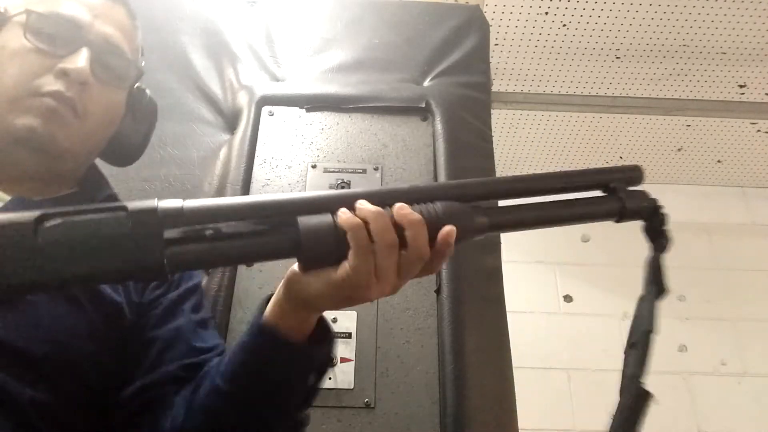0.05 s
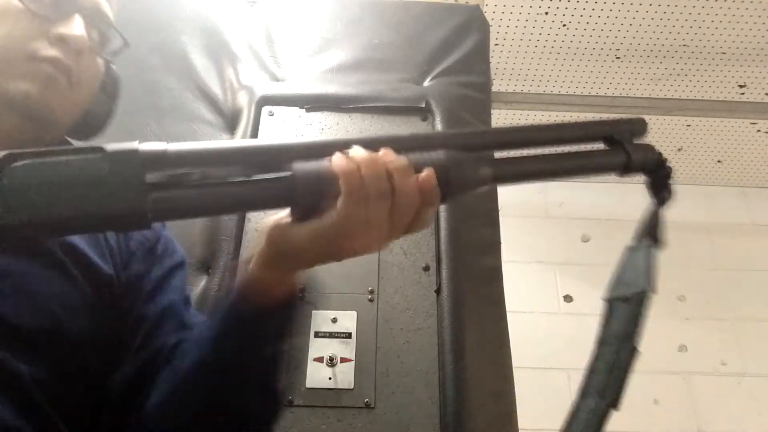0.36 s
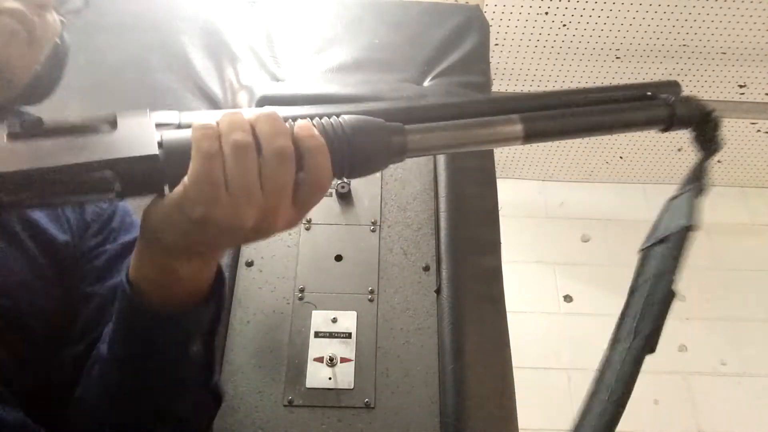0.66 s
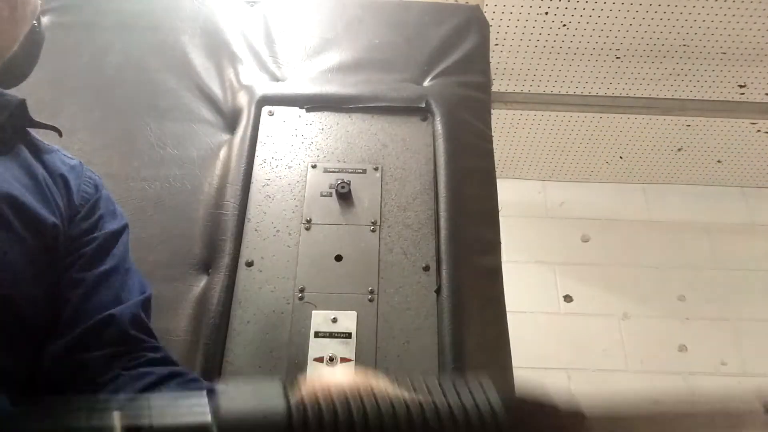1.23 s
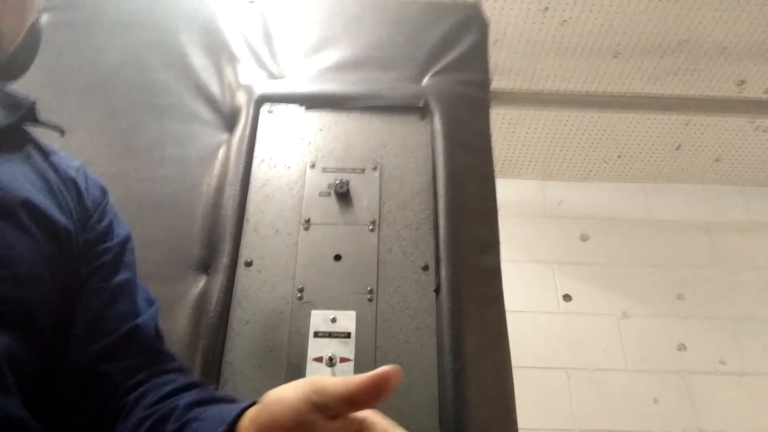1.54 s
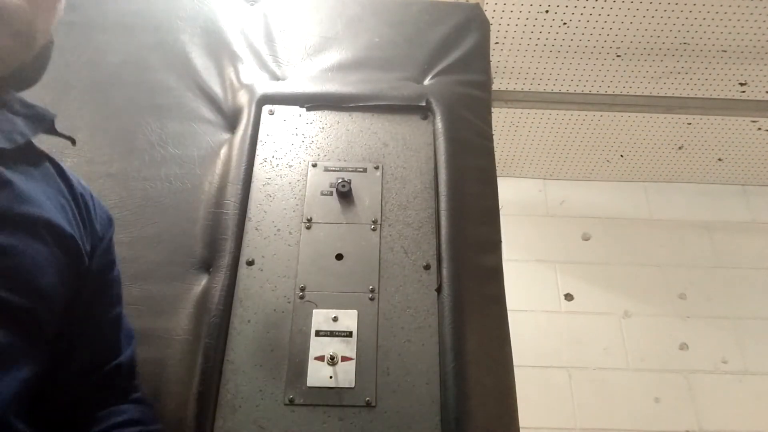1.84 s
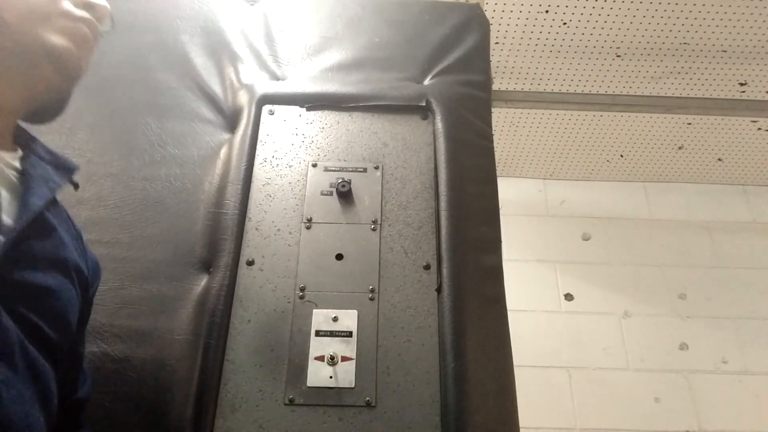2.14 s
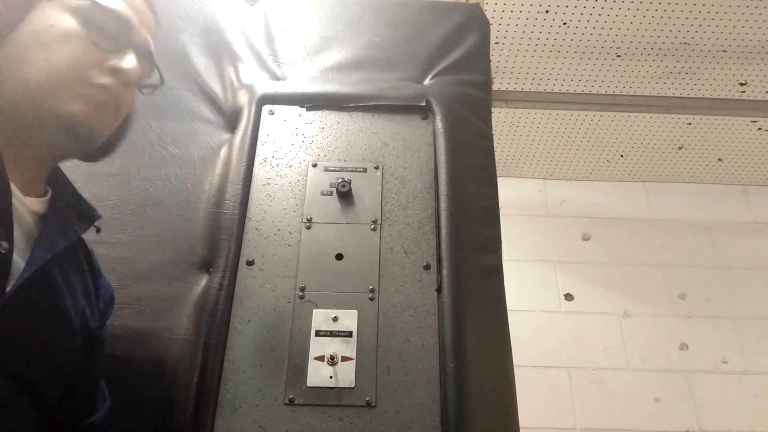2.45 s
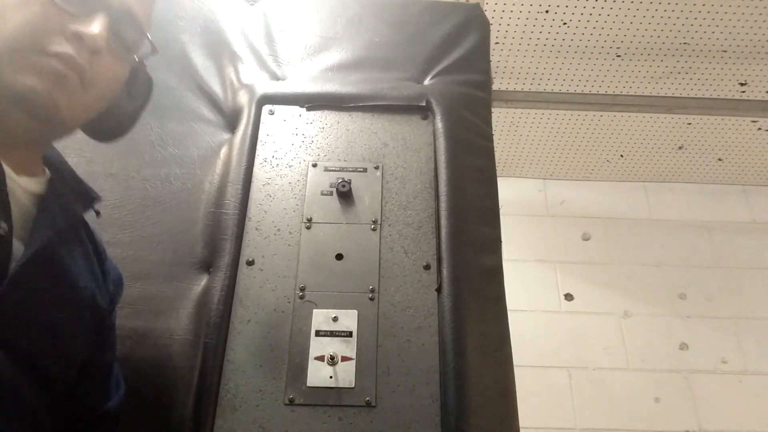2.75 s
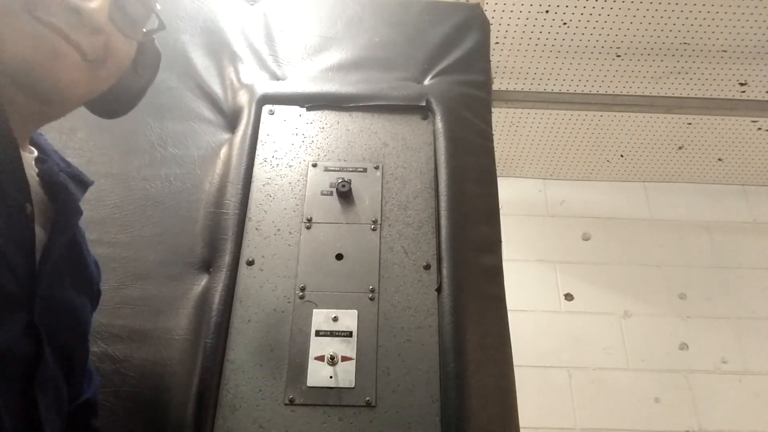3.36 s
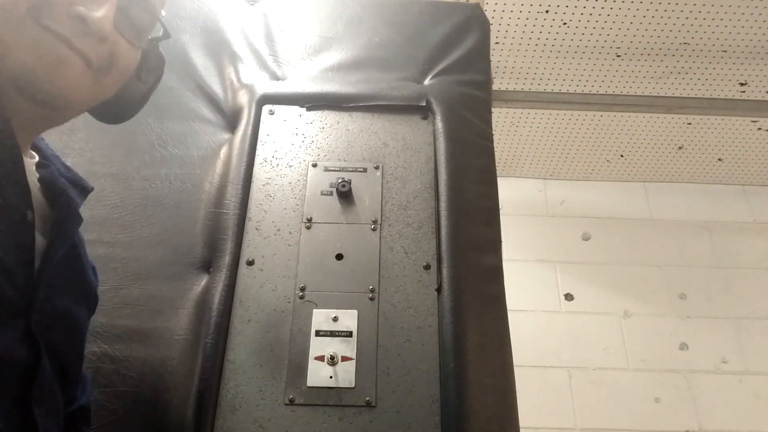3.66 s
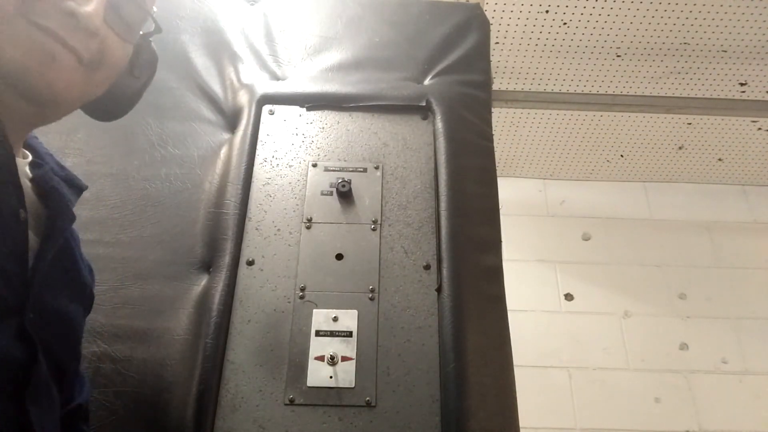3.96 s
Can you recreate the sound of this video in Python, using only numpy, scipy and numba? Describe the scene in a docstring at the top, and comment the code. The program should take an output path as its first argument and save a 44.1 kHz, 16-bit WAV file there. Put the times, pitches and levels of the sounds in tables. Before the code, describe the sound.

Sharp steel clacks of a shotgun being pumped, then soft knocks in a humming indoor range.

```python
"""Ventilation hums in the booth of an indoor range. A pump-action shotgun is racked twice: steel parts
clack in quick clusters, the forend (the sliding grip) scrapes, the bolt thuds and the hall rings on.
Automatic gain control turns the sound down at loud clacks, then lets the room swell back.
A jacket rustles, the gun is set down on the bench with a few knocks and a rattle, and the jacket
brushes softly three more times over the hum."""
import sys
import numpy as np
from scipy import signal
from scipy.fft import rfft, irfft, next_fast_len
from scipy.io import wavfile
from scipy.ndimage import map_coordinates
from numba import njit

SR = 44100
rng = np.random.default_rng(int(sys.argv[2]) if len(sys.argv) > 2 else 0)


def transcribe(signal):
    """Save signal, clipped to [-1, 1], as a 16-bit WAV file at the path in sys.argv[1]."""
    frames = np.atleast_2d(signal).T
    limited = np.clip(frames, -1, 1)
    pcm = np.round(limited * 32767).astype(np.int16)
    wavfile.write(sys.argv[1], SR, pcm)


N = 176400  # 4 seconds

# tone of the rushing air: (frequency [Hz], level [dB])
AIR_TONE = [(20, 6), (40, -9.5), (75, 2), (110, -5), (165, -2), (205, 2.5), (240, -8), (330, -8.5),
            (530, -5), (750, -7.5), (950, -8), (1350, -15), (1900, -21), (2700, -22.5), (3800, -23.5),
            (5500, -28), (10000, -29.5), (15500, -35)]
# the fan's hum: (multiple of its turning rate, level [dB])
FAN_HUM = [(1, -29.5), (3, -26.5), (5, -40), (18, -39)]
# steel hitting steel inside the gun: (time [s], level [dB], treble tilt [dB per octave])
CLACK_HITS = [(0.027, -17, -11.5), (0.0592, -20.5, -4), (0.066, -20.5, 1), (0.0828, -17, 2),
              (0.0903, -11, 4.5), (.1238, -4.5, -1), (.133, -10.5, -4), (0.1418, -3.5, 0.5),
              (0.158, -0.5, 1.5), (0.1664, 1, -2.5), (.176, 12.5, 1), (.261, -1.5, -2.5), (0.2967, -5.5, 2),
              (.309, -6.5, 1), (0.3178, 3, 7), (.3205, 10, -1), (.329, 11, 1), (.4472, -1.5, 11),
              (.4673, -12, 5), (0.4896, 5, 5), (0.4982, 3.5, -1), (.506, 10, 0), (.514, 9.5, 0),
              (.521, 3.5, 4), (.5582, 7, 0), (0.5882, -2, 5), (0.593, -3, -4), (.602, 0, -3),
              (.6122, 12, 0), (0.6143, 12.5, -2), (.621, 11.5, 1.5)]
# tone of a clack: (frequency [Hz], level [dB])
CLACK_TONE = [(100, -7), (300, -8.5), (1000, -6), (1750, -5.5), (2500, -9), (3700, 0), (5800, 1),
              (8000, 1.5), (11000, -0.5), (15500, 1)]
# ringing barrel, receiver (the gun's body) and magazine tube: (frequency [Hz], level [dB], fade time [s])
STEEL_NOTES = [(1104, -10, .12), (1480, -12, .15), (4549, -4, .2), (5003, 2, .17), (5139, 3, .17),
               (5372, 0, .15), (5462, -1, .15), (5860, -1, .15), (6189, 0, .13), (6357, -2, .15),
               (10825, -3, .18), (11430, -3, .12), (12431, -2, .2), (13105, -1, .2)]
# how long the hall rings: (frequency [Hz], fade time [s])
HALL_FADES = [(200, 0.32), (1500, 0.71), (4000, 0.65), (8000, 0.55), (12000, 0.42), (16000, 0.25)]
# the forend sliding on its tube: (start [s], end [s], level [dB])
SLIDE_STROKES = [(0.098, 0.17, -28.5), (0.37, 0.486, -15), (0.582, .62, -8.5)]
# tone of the scraping: (frequency [Hz], level [dB])
SLIDE_TONE = [(200, -26), (700, -5.5), (1700, -6), (2600, -11), (4000, -4), (8000, -2.5), (15500, -6)]
# the bolt slamming into its end stops: (time [s], level [dB])
BOLT_HITS = [(.177, 2), (0.3205, 10.5), (0.5142, 5.5), (0.6138, 8.5)]
# tone of a thud: (frequency [Hz], level [dB])
THUD_TONE = [(60, 12), (350, 0.5), (1000, -3), (2200, -5), (5000, -26)]
# the jacket brushing: (middle time [s], half length [s], level [dB], treble tilt [dB per octave])
CLOTH_SWELLS = [(1.17, 0.069, -44, 5), (2.74, 0.071, -44, 0), (3.36, 0.11, -41.5, 5),
                (3.903, 0.2, -41, -2.5)]
# tone of the cloth: (frequency [Hz], level [dB])
CLOTH_TONE = [(1000, -2), (2400, -10), (3600, 4), (5000, -6), (9000, -11), (12000, -8.5), (15500, -23)]
# the gun meeting the bench: (time [s], knock level [dB], rattle level [dB])
BENCH_HITS = [(1.668, -13.5, -34), (1.6742, -15.5, -40), (1.680, -15, -18), (1.687, -12, -13.5),
              (1.693, -14, -19), (1.697, -16, -32), (1.709, -22, -22), (1.718, -17, -18.5),
              (1.7265, -17.5, -30), (1.802, -22.5, -28), (1.828, -40, -27), (1.853, -47, -26.5),
              (1.879, -49, -31)]
# tone of a knock: (frequency [Hz], level [dB])
KNOCK_TONE = [(60, -5), (230, -2), (500, -1), (1050, 0.5), (1650, -7.5), (2600, -14), (4000, -22),
              (12000, -31)]
# the ringing bench: (frequency [Hz], level [dB], fade time [s])
BENCH_NOTES = [(272, 1, 0.15), (468, 2, 0.11), (902, 2, 0.084), (1120, 2.5, 0.1), (1476, 2.5, 0.12)]
# tone of the loose parts rattling: (frequency [Hz], level [dB])
RATTLE_TONE = [(500, -13), (2000, 2), (6000, -3.5), (10000, -2.5), (15500, -2.5)]

# A fade time, or T60, is the seconds a sound takes to fall by 60 dB.
AIR_DB, TOP_HZ = -27, 15850
DUCT_HZ, DUCT_WIDTH_HZ, DUCT_DB, DUCT_THROB_DB, DUCT_THROB_PER_S = 135.6, 14.6, -25.5, 2, 9
FAN_HZ, FAN_DRIFT_HZ, FAN_WAVER_DB = 19.6, 0.042, 1.1
CLACK_ATTACK_S, CLACK_HOLD_S, CLACK_T60, STEEL_RING_DB = 0.00077, 0.0011, 0.014, -30.5
CHATTER_DB, CHATTER_T60, CHATTER_GROWTH = -9.5, 0.072, 0.43  # growth: extra dB for each dB of the hit
RIPPLE_DB, RIPPLE_STEP_HZ = 2.5, 440
HALL_DB, HALL_BUILD_S = -13, 0.0096
SLIDE_EDGE_S, SLIDE_GRAIN_DB = 0.012, -0.5
THUD_T60, RECEIVER_HZ, RECEIVER_DB, RECEIVER_T60 = 0.0094, [770, 1780, 2134], -19, 0.037
LANDING_S, LANDING_HZ, LANDING_DB, LANDING_T60 = 1.668, 43.8, -10, 0.15
KNOCK_ATTACK_S, KNOCK_T60, BENCH_RING_DB, RATTLE_T60 = 0.00072, 0.062, -15.5, 0.023
CEILING, GAIN_ATTACK_S, GAIN_HOLD_S, GAIN_RELEASE_S = 0.76, 0.00015, 0.034, 0.074
GAIN_WINDOW_DB = 7  # peaks this close under the ceiling keep the volume from coming back
THUMP_PER_DB, THUMP_HZ = 0.04, 5.6


def amp(db):
    """Turn decibels into a number to multiply by."""
    return 10 ** (np.asarray(db) / 20)


def unit(x):
    """Scale a sound to an average power of 1."""
    return x / np.sqrt(np.mean(x ** 2) + 1e-20)


def along(points, hz):
    """Read between the rows of a (frequency, value) table on a log scale."""
    freqs, values = np.transpose(points)
    return np.interp(np.log(hz + 1), np.log(freqs + 1), values)


def filtered(x, response):
    """Multiply each frequency in a sound by response(hz)."""
    size = next_fast_len(len(x) + SR // 4)
    return irfft(rfft(x, size) * response(np.fft.rfftfreq(size, 1 / SR)), size)[:len(x)]


def noise(tone, size, tilt_db=0):
    """Noise with the given tone; a positive tilt makes it brighter."""
    gain = lambda hz: amp(along(tone, hz) + tilt_db * np.log2(1 + hz / 2000)) * (hz < TOP_HZ)
    return unit(filtered(rng.standard_normal(size), gain))


def wobble(rate):
    """A smooth curve through `rate` random values a second."""
    return map_coordinates(rng.standard_normal(int(N * rate / SR) + 4), [np.arange(N) * rate / SR])


def fade(t, t60):
    """Die away by 60 dB every t60 seconds."""
    return np.exp(-np.log(1000) * t / t60)


def ring(notes, t):
    """The fading notes of a struck object, a little different at every hit."""
    return sum(amp(db + 2 * rng.standard_normal()) * fade(t, t60)
               * np.sin(2 * np.pi * (hz * t + rng.random())) for hz, db, t60 in notes)


def add(track, s, sound):
    """Mix a sound in, starting at s seconds."""
    part = track[round(s * SR):][:len(sound)]
    part += sound[:len(part)]


def ventilation():
    """Air rushes, a duct booms around one low note and a slightly unsteady fan hums."""
    duct = unit(filtered(rng.standard_normal(N), lambda hz: 1 / (1 + ((hz - DUCT_HZ) / DUCT_WIDTH_HZ) ** 2)))
    air = amp(AIR_DB) * noise(AIR_TONE, N)
    throb = amp(DUCT_THROB_DB * wobble(DUCT_THROB_PER_S))
    out = air + amp(DUCT_DB) * unit(duct * throb)
    turns = np.cumsum(FAN_HZ + FAN_DRIFT_HZ * wobble(4.58)) / SR
    for multiple, db in FAN_HUM:
        level = np.sqrt(2) * amp(db + FAN_WAVER_DB * wobble(7.6))
        out += level * np.sin(2 * np.pi * (multiple * turns + rng.random()))
    return out


def steel_clacks():
    """Steel cracks and rings faintly at each hit; harder hits set loose parts chattering."""
    direct, all_round, t = np.zeros(N), np.zeros(N), np.arange(SR // 4) / SR
    crack = fade(np.maximum(t - CLACK_HOLD_S, 0), CLACK_T60)
    for s, db, tilt in CLACK_HITS:
        chatter = amp(CHATTER_DB + CHATTER_GROWTH * db) * fade(t, CHATTER_T60)
        shape = np.hypot(crack, chatter) * (1 - np.exp(-t / CLACK_ATTACK_S))
        burst = shape * noise(CLACK_TONE, len(t), tilt)
        clack = amp(db) * (burst + amp(STEEL_RING_DB) * ring(STEEL_NOTES, t))
        add(all_round, s, clack)
        add(direct, s, aimed(clack))
    return direct, all_round


def aimed(sound):
    """Each hit sends its sound toward the microphone differently, giving random peaks and dips in tone."""
    ripple_db = RIPPLE_DB * rng.standard_normal(128)
    return filtered(sound, lambda hz: amp(np.interp(hz / RIPPLE_STEP_HZ, np.arange(128), ripple_db)))


def hall(x):
    """The range's echo builds up quickly, then fades; the middle pitches last longest."""
    hz, t, bands = signal.stft(rng.standard_normal(SR), SR, nperseg=256)
    bands = bands * fade(t, along(HALL_FADES, hz)[:, None]) * (1 - np.exp(-t / HALL_BUILD_S))
    tail = signal.istft(bands, SR, nperseg=256)[1]
    return signal.fftconvolve(x, tail / np.linalg.norm(tail))[:N]


def forend_scrape():
    """The grip makes a grainy scrape while it slides along its tube."""
    t = np.arange(N) / SR
    strokes = sum(amp(db) * np.clip(np.minimum(t - start, end - t) / SLIDE_EDGE_S + .5, 0, 1)
                  for start, end, db in SLIDE_STROKES)
    return strokes * unit(noise(SLIDE_TONE, N) * amp(SLIDE_GRAIN_DB * wobble(400)))


def bolt_thuds():
    """The bolt stops with a dull thud at either end of its travel, and the hollow receiver rings."""
    out, t = np.zeros(N), np.arange(SR // 10) / SR
    for s, db in BOLT_HITS:
        hollow = ring([(hz, RECEIVER_DB, RECEIVER_T60) for hz in RECEIVER_HZ], t)
        thud = fade(t, THUD_T60) * noise(THUD_TONE, len(t))
        add(out, s, amp(db) * (thud + hollow))
    return out


def jacket_rustle():
    """Cloth rubs in soft swells as the shooter moves."""
    t = np.arange(N) / SR
    return sum(amp(db) * np.exp(-.5 * ((t - s) / width) ** 2) * noise(CLOTH_TONE, N, tilt)
               for s, width, db, tilt in CLOTH_SWELLS)


def set_down():
    """The gun's weight rocks the bench; it knocks a few times while its loose parts rattle and settle."""
    out, t = np.zeros(N), np.arange(SR // 3) / SR
    rocking = amp(LANDING_DB) * fade(t, LANDING_T60) * np.sin(2 * np.pi * LANDING_HZ * t)
    add(out, LANDING_S, rocking)
    onset = 1 - np.exp(-t / KNOCK_ATTACK_S)
    for s, knock_db, rattle_db in BENCH_HITS:
        knock = fade(t, KNOCK_T60) * noise(KNOCK_TONE, len(t)) + amp(BENCH_RING_DB) * ring(BENCH_NOTES, t)
        rattle = fade(t, RATTLE_T60) * noise(RATTLE_TONE, len(t))
        add(out, s, (amp(knock_db) * knock + amp(rattle_db) * rattle) * onset)
    return out


def scene():
    """The gun close by, with the hall's echo, over the ventilation."""
    direct, all_round = steel_clacks()
    handling = bolt_thuds() + forend_scrape() + set_down()
    echo = amp(HALL_DB) * hall(all_round + handling)
    return (direct + handling + echo + jacket_rustle() + ventilation())[None]


@njit
def ducking(excess_db, attack, hold, release, window_db):
    """How many dB to turn the sound down: grab fast, hold, then let go (times in samples)."""
    out, cut, wait = np.zeros(len(excess_db)), 0., 0.
    for i in range(len(excess_db)):
        if excess_db[i] > cut:
            cut += (excess_db[i] - cut) * (1 - np.exp(-1 / attack))
        if excess_db[i] > cut - window_db:
            wait = hold
        elif wait > 0:
            wait -= 1
        else:
            cut -= cut / release
        out[i] = cut
    return out


def record(dry):
    """Gain control ducks loud hits with a deep thump; peaks are rounded and the top treble is cut."""
    x = dry[0]
    excess_db = 20 * np.log10(np.abs(x) / CEILING + 1e-9)
    cut_db = ducking(excess_db, GAIN_ATTACK_S * SR, GAIN_HOLD_S * SR, GAIN_RELEASE_S * SR, GAIN_WINDOW_DB)
    # the volume's own movement leaks into the sound, mostly between THUMP_HZ and 120 Hz
    thump = THUMP_PER_DB * filtered(cut_db, lambda hz: 1j * hz / (THUMP_HZ + 1j * hz) / (1 + 1j * hz / 120))
    ducked = x * amp(-cut_db) + thump
    rounded = ducked / (1 + np.abs(ducked / CEILING) ** 6) ** (1 / 6)
    return filtered(rounded, lambda hz: hz < TOP_HZ)[None]


dry = scene()
out = record(dry)
transcribe(out)
```